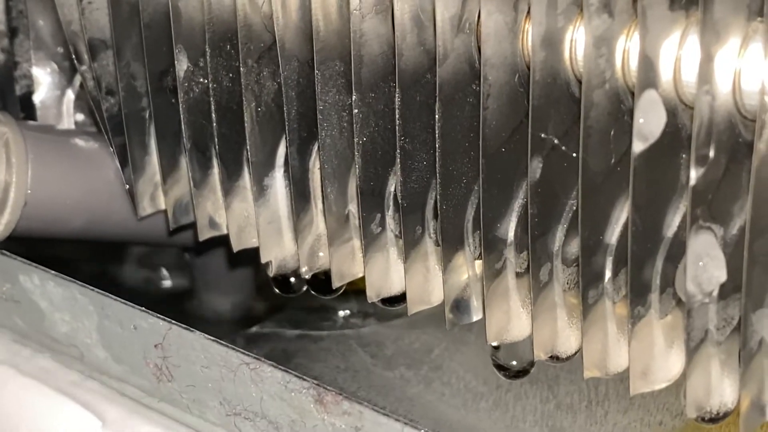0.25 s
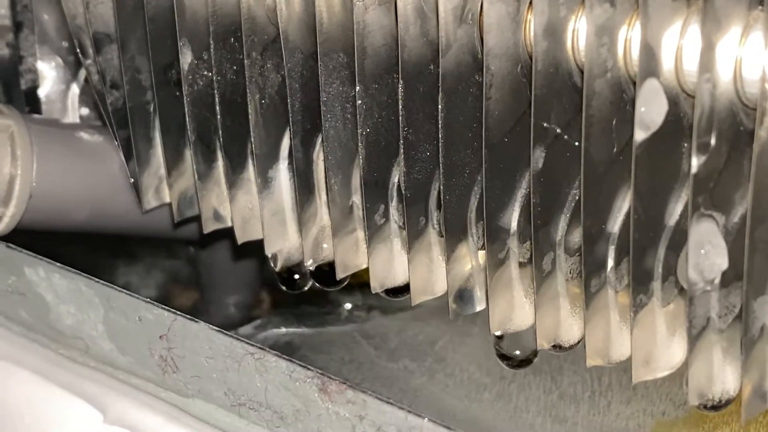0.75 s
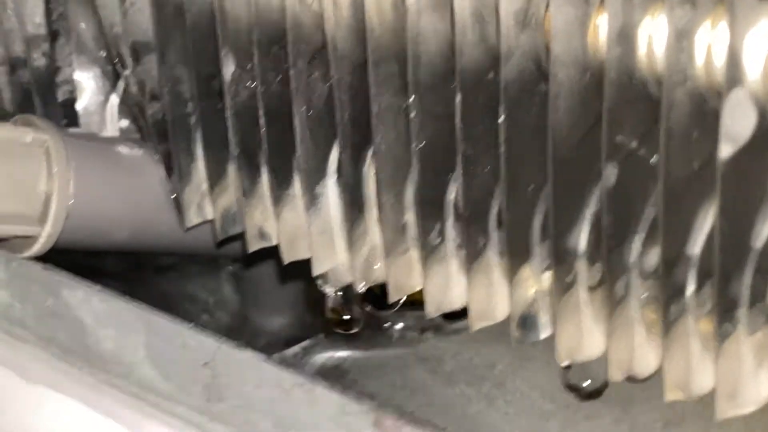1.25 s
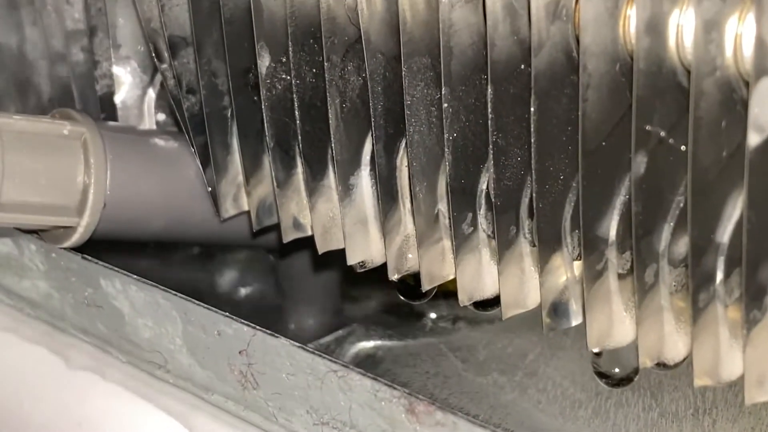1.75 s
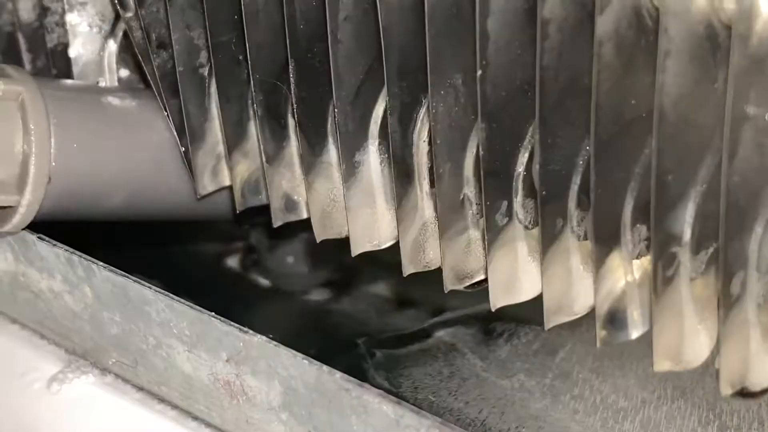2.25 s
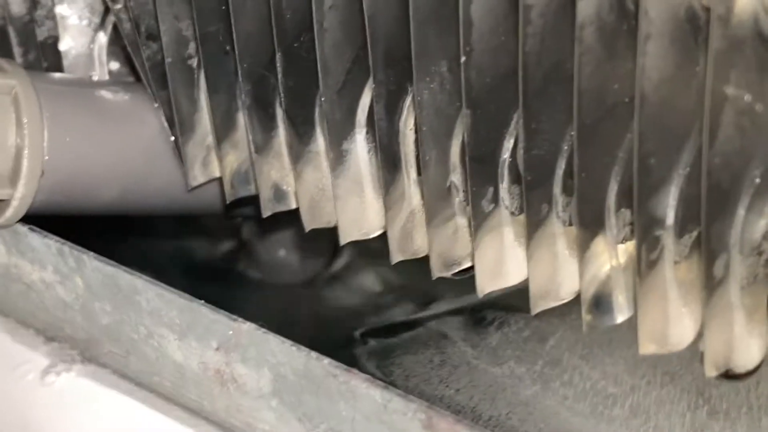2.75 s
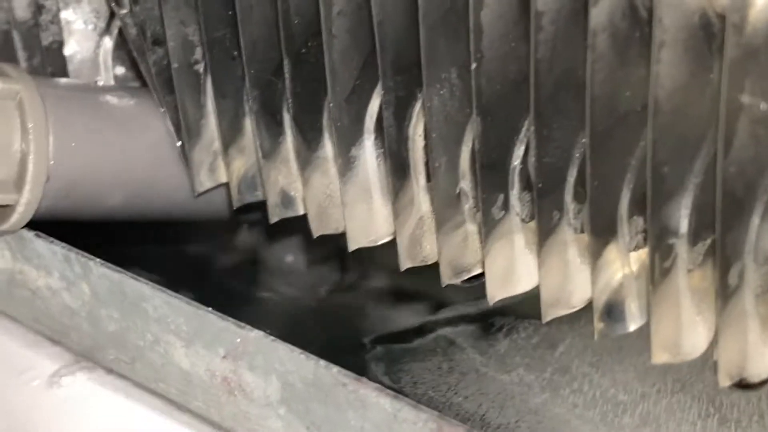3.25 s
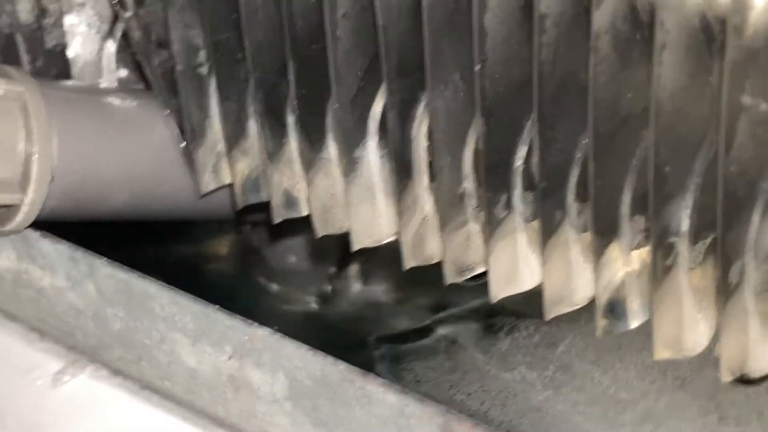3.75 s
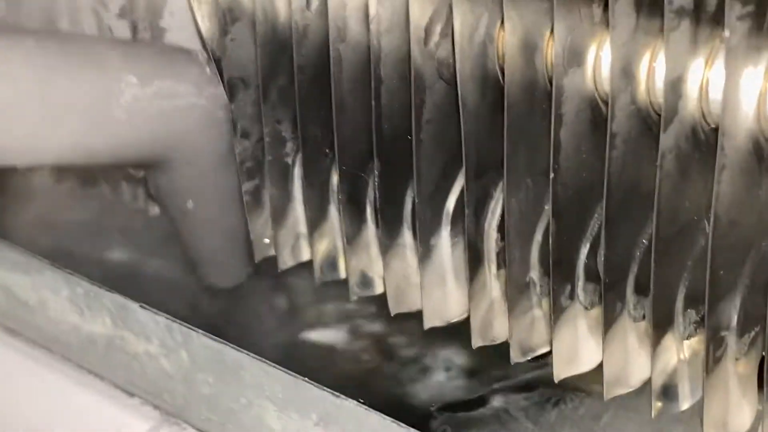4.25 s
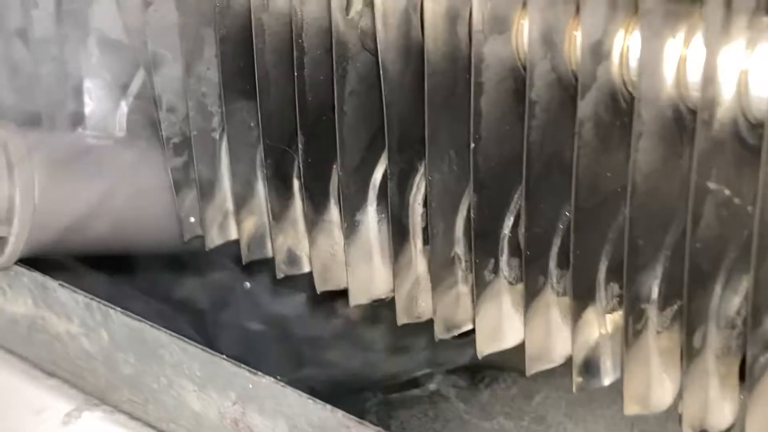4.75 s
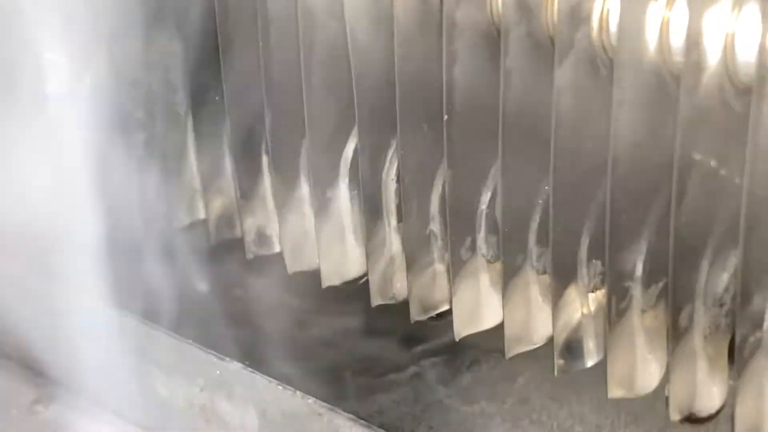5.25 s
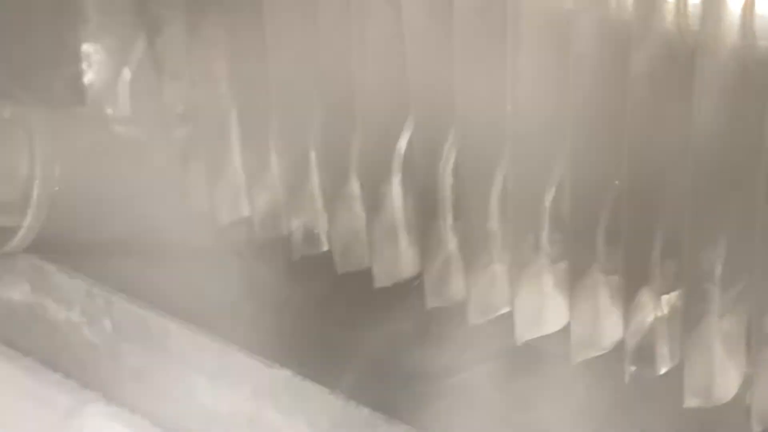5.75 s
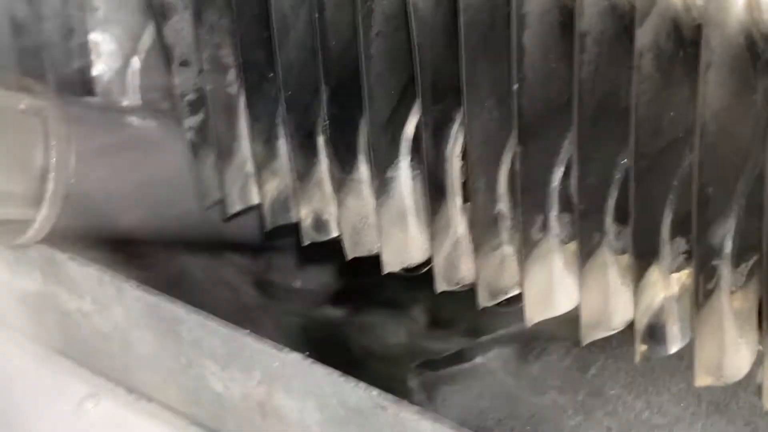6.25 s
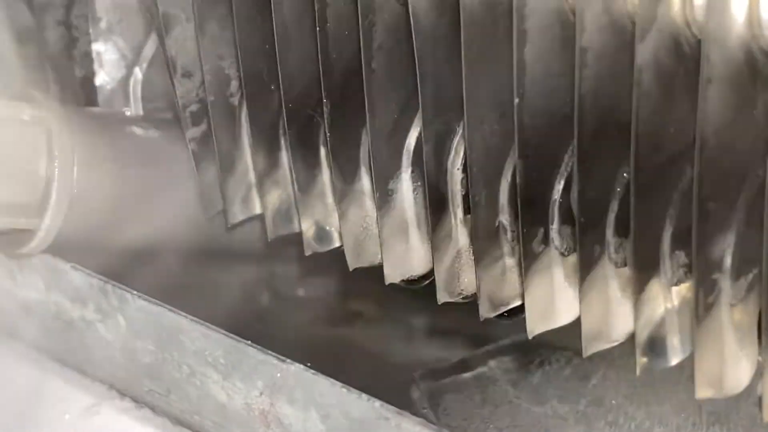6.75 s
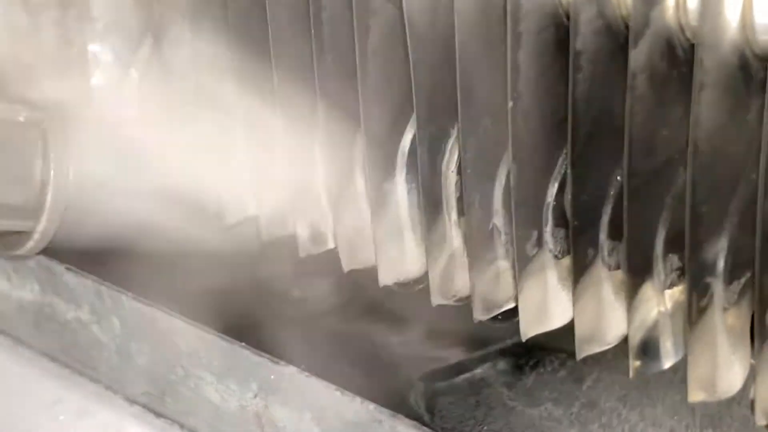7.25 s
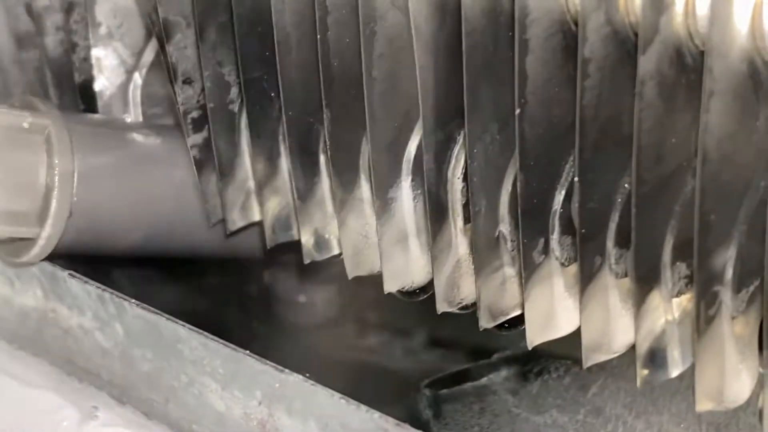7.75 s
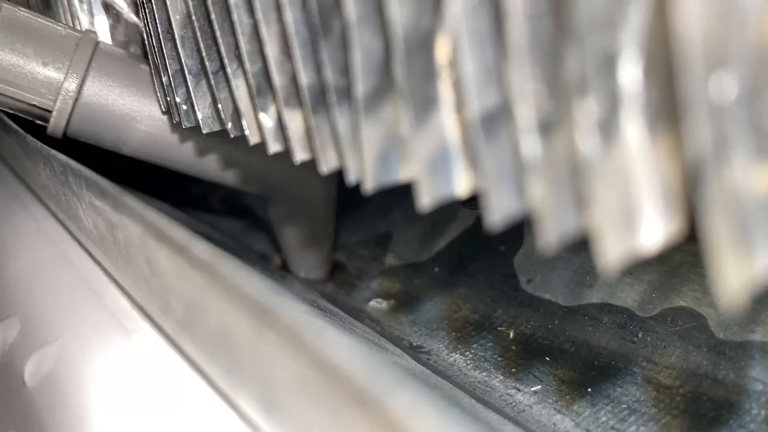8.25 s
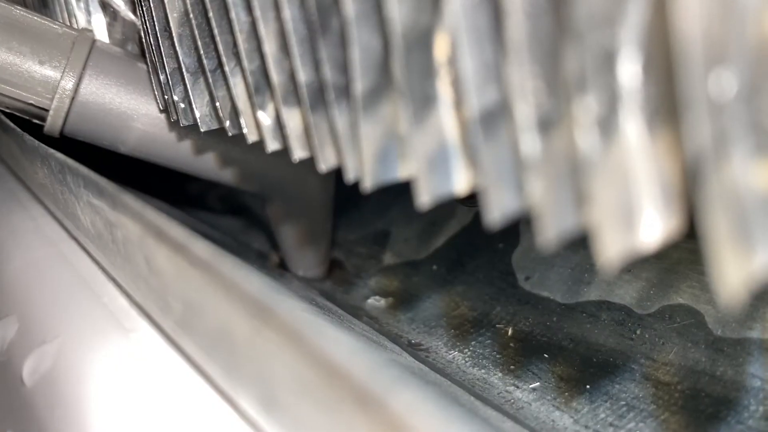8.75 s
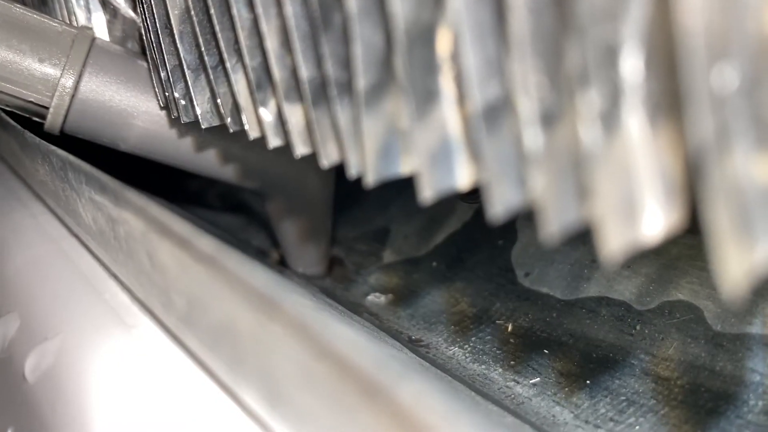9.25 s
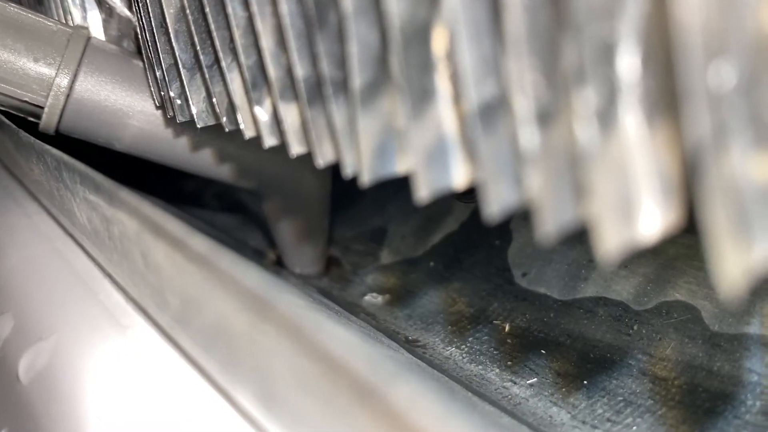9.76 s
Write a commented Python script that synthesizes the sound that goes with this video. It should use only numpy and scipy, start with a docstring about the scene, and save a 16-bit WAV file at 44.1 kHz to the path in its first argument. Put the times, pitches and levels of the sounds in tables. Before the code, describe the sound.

A vacuum nozzle slurps and gurgles in a metal pan of water, crackles and thumps while submerged, then rushes steadily.

```python
"""A hose nozzle works in the water of a metal drain pan inside a small cabinet, heard from three places.
First it slurps at the surface: spray squirts, the gap under it whistles, a hollow gulps, froth builds.
From 2.3 s, under water, gas pockets collapse with a crack and thump the pan. Near 4.1 s the nozzle
lifts clear and hisses for half a second, then the collapses return. From 8.1 s, heard from the side,
the free jet rushes steadily."""
import sys
import numpy as np
from scipy import signal
from scipy.fft import rfft, irfft, next_fast_len
from scipy.io import wavfile
from scipy.ndimage import uniform_filter1d, map_coordinates

SR = 44100
rng = np.random.default_rng(int(sys.argv[2]) if len(sys.argv) > 2 else 0)


def unload_audio(sound):
    """Save the sound as a 16-bit wav file, at the path given as the first command line argument."""
    columns = np.transpose(np.atleast_2d(sound))
    # keep every value between -1 and 1, then stretch to whole-number steps
    steps = np.round(np.clip(columns, -1, 1) * 32767)
    wavfile.write(sys.argv[1], SR, steps.astype(np.int16))


N = 441000
TIME = np.arange(N) / SR


def amp(db):
    return 10 ** (np.asarray(db) / 20)


def unit(x):
    return x / np.sqrt(np.mean(x ** 2, axis=-1, keepdims=True) + 1e-20)


def along(table, hz, column=1):
    """One column of a frequency table, read on a log axis."""
    columns = np.transpose(table)
    return np.interp(np.log(hz + 1), np.log(columns[0] + 1), columns[column])


def fader(table):
    """A gain through (time_s, level_db) points, silent outside them."""
    return amp(np.interp(TIME, *np.transpose(table), left=-200, right=-200))


def wobble(rate_hz):
    """A smooth random curve."""
    return map_coordinates(rng.standard_normal(int(N * rate_hz / SR) + 4), [TIME * rate_hz])


def filtered(x, response):
    """x through a complex frequency response."""
    n = x.shape[-1]
    size = next_fast_len(n + 8192)
    return irfft(rfft(x, size) * response(np.fft.rfftfreq(size, 1 / SR)), size)[..., :n]


def modes(table):
    """The response of a set of resonances."""
    return lambda f: sum((-1) ** k * amp(db) * 1j * f * width / (hz * hz - f * f + 1j * f * width)
                         for k, (hz, width, db) in enumerate(table))


def peaked(spectrum, peaks, lift):
    """A broad spectrum with resonant peaks standing on it."""
    return lambda f: amp(along(spectrum, f)) * np.sqrt(1 + sum(
        lift * amp(db) ** .5 / (1 + (2 * (f - hz) / width) ** 2) ** 2 for hz, width, db in peaks))


def noise(response, flutter_db, rate_hz):
    """Coloured noise of rms 1 whose level flutters."""
    return unit(filtered(amp(flutter_db * wobble(rate_hz)) * rng.standard_normal(N), response))


def placed(start_s, sounds):
    """Sums short sounds at their start times."""
    at = np.round(np.asarray(start_s) * SR).astype(int)[:, None] + np.arange(sounds.shape[1])
    return np.bincount(at.ravel(), sounds.ravel(), N + SR)[:N]


def gate(rows, edge_s=.008):
    """A gain that opens for each (start_s, length_s, level_db) row."""
    start, length, db = np.transpose(rows)[:, :, None]
    t = np.arange(SR // 3) / SR
    return placed(start[:, 0], amp(db) * np.clip(np.minimum(t, length - t) / edge_s + 0.74, 0, 1))


def bursts(count, t60, response, rise_s, lumps=0.41):
    """Rows of lumpy, decaying noise, peak 1."""
    t = np.arange(SR // 10) / SR
    grain = np.exp(lumps * unit(uniform_filter1d(rng.standard_normal((count, len(t))), size=40)))
    envelope = amp(-60 * t / t60) * (1 - np.exp(-t / rise_s))
    rows = filtered(grain * rng.standard_normal(grain.shape) * envelope, response)
    return rows / np.abs(rows).max(axis=1, keepdims=True)


def bubbles(count, centre_hz, spread, cycles):
    """Random small bubbles, rms 1: damped tones that rise in pitch."""
    when, pitch, size = rng.random(count), 2 * rng.random((count, 1)) - 1, rng.random((count, 1))
    age = np.arange(SR // 40) / SR * centre_hz * np.exp(spread * pitch) / cycles
    tone = np.sin(2 * np.pi * cycles * (age + 0.25 * age ** 2))
    return unit(placed(when * N / SR, amp(20 * size) * age * np.exp(-4 * age) * tone))


def rings(rows, cycles, climb):
    """Single bubbles: a soft start, a few cycles, the pitch climbing."""
    start, db, hz = np.transpose(rows)[:, :, None]
    age = np.arange(SR // 20) / SR * hz / cycles
    tone = np.sin(2 * np.pi * cycles * (age + climb * age ** 2))
    return placed(start[:, 0], amp(db) * 4 * age * np.exp(1 - 4 * age) * tone)


# Whistle glides: start_s, length_s, from_hz, to_hz, level_db
WHISTLES = [(.0, 0.029, 3500, 1900, -43), (0.092, 0.049, 4500, 1880, -44.5),
            (0.19, 0.056, 4010, 1840, -47.5), (0.397, 0.059, 4610, 1710, -45),
            (0.51, 0.064, 4430, 1910, -45), (0.734, 0.056, 4630, 2720, -53), (0.942, 0.04, 4540, 3500, -44),
            (2.095, 0.045, 4220, 2020, -47), (4.054, 0.063, 499, 1385, -36.5),
            (4.09, 0.0606, 1285, 1517, -29), (4.562, .042, 5570, 6750, -40)]

def whistles(mouth_hz=(4150, 3200, 2100), mouth_db=(4, 10, 5), rough_hz=200):
    """The gap under the nozzle changes size: a breathy tone glides, flaring at the mouth's pitches."""
    start, length, from_hz, to_hz, db = np.transpose(WHISTLES)[:, :, None]
    progress = np.clip(np.arange(SR // 8) / SR / length, 0, 1)
    hz = from_hz + (to_hz - from_hz) * progress
    hz -= sum(0.98 * (hz - mouth) * np.exp(-((hz - mouth) / 420) ** 2) for mouth in mouth_hz)  # lingers
    phase = 2 * np.pi * np.cumsum(hz, axis=1) / SR
    flare_db = sum(top / (1 + ((hz - mouth) / 260) ** 2) for mouth, top in zip(mouth_hz, mouth_db))
    fuzz = unit(filtered(rng.standard_normal((4, *hz.shape)), lambda f: 1 / (1 + (f / rough_hz) ** 2)))
    tone = fuzz[0] * np.sin(phase) + fuzz[1] * np.cos(phase)
    octave = fuzz[2] * np.sin(2 * phase) + fuzz[3] * np.cos(2 * phase)
    tone += amp(-9) * (to_hz < from_hz) * octave
    return placed(start[:, 0], amp(db + flare_db) * np.sin(np.pi * progress ** 0.44) ** 0.49 * tone)


# The hollow stands open and spray escapes: start_s, length_s, spray_db
GULPS = [(0.034, 0.049, -53), (0.146, 0.042, -45), (0.248, 0.066, -47), (0.453, 0.062, -46),
         (0.577, 0.087, -41.5), (0.704, 0.039, -42.5), (0.793, 0.075, -45), (0.902, 0.039, -57),
         (1.001, 0.098, -50.5), (1.137, 0.063, -73), (1.23, 0.187, -49), (1.453, 0.13, -64),
         (1.606, .18, -58), (1.821, 0.2, -54), (2.048, 0.051, -43.5), (2.169, .22, -48.5)]
# Bursts of spray alone: start_s, length_s, level_db
SQUIRTS = [(0, 0.021, -38.5), (.083, 0.05, -40), (.185, 0.043, -38), (.385, 0.053, -38.5),
           (.51, 0.048, -41.5), (.739, 0.024, -46), (.93, 0.029, -42.5), (2.09, 0.027, -41.5)]
# Spray colour: freq_hz, level_db
SPRAY_EQ = [(500, 5.5), (1500, -13), (2400, 5.5), (3200, -2.5), (3800, -7.5), (4600, 5), (5700, -7),
            (6500, 0.5), (7600, -3), (9700, -5.5), (12000, -5.5), (16000, -9)]

def spray(froth):
    """Spray hisses from the nozzle, chopped ever harder as the froth thickens."""
    sputter = unit(amp((1.26 + 0.58 * froth) * 3 * (wobble(110) + wobble(34.86))))
    hiss = noise(lambda f: amp(along(SPRAY_EQ, f)), flutter_db=3, rate_hz=120)
    squirt = noise(lambda f: amp(along(SPRAY_EQ, f)) / (1 + (3000 / (f + 1)) ** 6), 4, rate_hz=64)
    fizz = froth * amp(-4.5) * bubbles(6000, centre_hz=2230, spread=0.29, cycles=9.5)
    return (amp(-55) + gate(GULPS)) * sputter * (hiss + fizz) + gate(SQUIRTS, edge_s=0.025) * squirt


# Hum fader: time_s, level_db
HUM_LEVEL = [(0, -53), (.07, -50), (.2, -53), (.45, -49), (.9, -50.5), (1.6, -48), (2.0, -48.5),
             (2.13, -49), (2.283, -44.5)]
# The pan's hum notes: pitch_hz, width_hz, level_db
HUM_MODES = [(172.5, 45, 1.5), (428, 54, -7)]

def pan_hum(lag_s=0.027, shut_gain=0.49):
    """The pan hums, swelling just after each gulp."""
    swell = shut_gain + gate([(start + lag_s, length, 0) for start, length, _ in GULPS], edge_s=0.025)
    return fader(HUM_LEVEL) * swell * noise(lambda f: modes(HUM_MODES)(f) ** 2, flutter_db=2, rate_hz=28)


# Resonances of the hollow: pitch_hz, width_hz, level_db
HOLLOW_MODES = [(1053, 105, -5.5), (1410, 77, -23), (835, 450, -11)]

def hollow(froth, open_db=-46.5):
    """Gas and water alternate in the nozzle: a hollow opens and shuts, bubbles, and hoots once."""
    opening = amp(-57) + gate([(start, length, open_db) for start, length, _ in GULPS])
    breath = noise(lambda f: modes(HOLLOW_MODES)(f) / (1 + (640 / (f + 1)) ** 6), 0, rate_hz=120)
    hoot = noise(lambda f: modes([(1046, 230, 0)])(f) ** 2, flutter_db=1, rate_hz=32)
    gurgle = froth * amp(-0.5) * bubbles(3000, centre_hz=1125, spread=0.36, cycles=7.5)
    blips = scattered(-43.5, bursts(170, t60=0.016, response=modes(HOLLOW_MODES), rise_s=0.0018))
    return opening * (breath + gurgle + blips / amp(open_db)) + gate([(0.352, 0.034, -33.5)]) * hoot


# The loudest spits: start_s, peak_db
SPITS = [(0.301, -30), (0.379, -34), (1.0415, -28), (1.242, -39), (1.321, -21), (1.396, -33), (1.455, -23),
         (1.513, -19), (1.545, -22), (1.558, -22), (1.572, -25), (1.6213, -23.5), (1.691, -22),
         (1.8102, -22.5), (1.8642, -22), (1.899, -19.5), (1.931, -23), (2.041, -24.5)]
# The loudest froth bubbles: start_s, peak_db, pitch_hz
BLOPS = [(0.934, -25.5, 1030), (1.0, -33, 1050), (1.163, -28, 1390), (1.235, -35, 980), (1.292, -38, 935),
         (1.34, -23.5, 1130), (1.395, -28, 1420), (1.448, -34, 1180), (1.48, -26.5, 1390),
         (1.593, -27, 1370), (1.701, -32, 923), (1.754, -27, 1220), (1.835, -28, 1440), (1.86, -32.5, 869),
         (1.92, -31, 904), (1.988, -28.5, 950), (2.077, -34, 1400), (2.18, -30, 1400), (2.271, -33, 1340)]

def frothing():
    """Froth spits and blops over a fine spatter."""
    start, db = np.transpose(SPITS)
    spits = bursts(len(start), 0.025, spit_colour(len(start), floor=1), rise_s=0.003, lumps=0.56)
    spatter = scattered(-36, bursts(140, 0.01, spit_colour(140, floor=0.28), rise_s=0.001))
    return placed(start, amp(db)[:, None] * spits) + spatter + rings(BLOPS, cycles=5.7, climb=0.034)


def spit_colour(count, floor):
    """Each spit favours the pitch of its own bubble."""
    hz = 1300 * 5.5 ** rng.random((count, 1))
    return lambda f: amp(along(SPRAY_EQ, f)) * (floor + 1 / (1 + ((f - hz) / (0.19 * hz)) ** 4))


def scattered(db, sounds, span_s=(1.0, 2.28), scatter_db=4):
    """Short sounds at random moments and levels."""
    size = amp(db + scatter_db * rng.standard_normal((len(sounds), 1)))
    return placed(rng.uniform(*span_s, len(sounds)), size * sounds)


# How hard the water boils round the nozzle: time_s, level_db
BOIL_LEVEL = [(2.283, -68), (2.38, -71), (2.39, -48), (2.6, -44.5), (3.3, -45), (4.1, -44), (4.2, -72),
              (4.59, -65.5), (4.61, -52), (4.9, -60.5), (5.1, -49.5), (5.7, -49), (6.2, -49.5),
              (7.2, -49.5), (8.13, -46.5)]
# Pan floor, trough and fins ringing: pitch_hz, width_hz, level_db
PAN_MODES = [(125.2, 48.6, -1.5), (177, 66, -5.5)]
TROUGH_MODES = [(367, 35.4, -0.5), (547, 33, 2.5), (655, 39, 1), (757, 51, -7), (874, 44, -2.5),
                (1051, 46, -8)]
FIN_MODES = [(1503, 33, 33), (1825, 84, 9), (1990, 60, 20), (2227, 116, 22), (3070, 430, 4),
             (3606, 240, 23)]
# Fizz colour: freq_hz, level_db
FIZZ_EQ = [(150, -50), (300, 7.5), (1000, -3), (2000, -11.5), (4000, -15), (6000, -18.5), (10000, -24),
           (16000, -23)]

def simmer():
    """Under water, small bubbles keep pan, trough and fins busy."""
    throb = noise(lambda f: modes(PAN_MODES)(f) / (1 + (f / 260) ** 4), flutter_db=1.5, rate_hz=50)
    churn = 1.14 * noise(modes(TROUGH_MODES), flutter_db=8.5, rate_hz=88)
    gurgle = bubbles(500, centre_hz=626, spread=0.454, cycles=6)
    churn += 0.38 * unit(filtered(gurgle, modes(TROUGH_MODES)))
    fizz = noise(peaked(FIZZ_EQ, FIN_MODES, lift=0.94), flutter_db=2.5, rate_hz=70)
    splutter = bubbles(6000, centre_hz=2500, spread=.5, cycles=6.7)
    fizz += 0.21 * unit(filtered(splutter, peaked([(1000, 0)], FIN_MODES, lift=.8)))
    return fader(BOIL_LEVEL) * (amp(5) * throb + churn + fizz)


# Small collapses whose crack stands out: start_s, crack_db
SMALL_POPS = [(2.5346, -18), (3.0121, -32), (3.1657, -29), (3.4151, -33.5), (3.5535, -30), (3.625, -34),
              (3.7183, -36), (3.822, -34), (5.3537, -37), (5.4293, -32), (5.8286, -33.5), (6.0487, -37),
              (6.1789, -34), (6.2654, -23), (6.3205, -32), (7.1672, -37), (7.3922, -33), (7.4927, -32),
              (7.6016, -37), (7.656, -36), (7.842, -33)]

def weak_pops(every_s=.034, jitter_s=.003):
    """Rows like POPS: the small collapses, and weak ones that fill the gaps and follow the boil."""
    over_boil_db, scatter_db = (4.5, -26.5, 4.5, 9.5), (5.9, 7.8, 7.8, 2.2)
    small_s, small_db = np.transpose(SMALL_POPS)
    edges = [BOIL_LEVEL[0][0], *np.sort([*np.transpose(POPS)[0], *small_s]), BOIL_LEVEL[-1][0]]
    fill_s = np.concatenate([np.linspace(a, b, max(round((b - a) / every_s), 1) + 1)[1:-1]
                             for a, b in zip(edges, edges[1:])])
    start = np.append(small_s, fill_s + jitter_s * rng.standard_normal(len(fill_s)))
    levels = np.interp(start, *np.transpose(BOIL_LEVEL))[:, None] + over_boil_db
    levels += scatter_db * rng.standard_normal(levels.shape)
    levels[:len(small_s), 0] = small_db
    return np.column_stack([start, levels])


# The clear collapses: start_s, crack_db, snap_db, knock_db, thump_db
POPS = [(2.4534, -26.5, -57, -31, -25.5), (2.5154, -10, -31, -18.5, -27), (2.5631, -12, -30.5, -20, -30),
        (2.637, -12.5, -34, -32, -26.5), (2.6804, -13, -53, -34, -26.5), (2.7123, -21.5, -36, -29, -29),
        (2.7689, -18, -37, -20.5, -25), (2.8377, -19.5, -30.5, -24, -25), (2.872, -29, -52, -42, -27),
        (2.9358, -18, -43, -33, -33), (3.046, -28, -51, -43, -52), (3.0722, -29, -45, -32.5, -25.5),
        (3.1992, -12, -34, -25, -23.5), (3.2765, -18, -39, -25, -31), (3.3076, -19, -35.5, -25, -32),
        (3.3537, -30, -35.5, -30.5, -27), (3.4527, -30, -58, -32, -38), (3.4868, -31.5, -54, -38, -26),
        (3.5226, -29, -53, -31.5, -49), (3.684, -32, -49, -53, -27.5), (3.7814, -26.5, -57, -36, -27),
        (3.868, -12, -30.5, -21, -28), (3.8868, -15.5, -32.5, -20.5, -33),
        (3.9145, -12.5, -32.5, -20.5, -29), (3.9887, -25.5, -50, -29, -45), (4.0516, -39, -48, -33, -33),
        (4.1012, -22, -53, -50, -43), (4.136, -23, -47, -45, -41), (4.7525, -29, -45, -58, -53),
        (4.791, -25.5, -45, -30, -42), (4.8273, -21, -43.5, -31, -38), (4.969, -33, -61, -31.5, -36),
        (5.051, -20.5, -44, -27, -31.5), (5.0866, -19, -39.5, -25, -32), (5.1271, -28, -61, -30.5, -30),
        (5.1705, -31, -43.5, -36, -34), (5.256, -38, -64, -32.5, -32), (5.3176, -27, -59, -42, -31.5),
        (5.3929, -21.5, -40.5, -26, -33), (5.4637, -31, -47, -28, -38), (5.5622, -23, -57, -21, -31.5),
        (5.5843, -16.5, -32.5, -23.5, -34), (5.613, -20, -38, -30, -29.5), (5.6404, -20, -53, -26.5, -35),
        (5.672, -22.5, -60, -26, -29.5), (5.7083, -21, -39.5, -28, -33), (5.739, -29, -63, -36, -35),
        (5.7953, -34, -64, -33.5, -32), (5.87, -17, -36, -22, -33), (5.897, -17, -35, -20.5, -34),
        (5.912, -15.5, -36, -30, -35), (5.9667, -28, -49, -29.5, -28.5), (6.142, -36, -58, -33, -38),
        (6.2506, -23, -39.5, -27.5, -42), (6.2858, -16, -35, -34, -32), (6.4459, -27, -48, -31, -40),
        (6.5098, -30, -49, -31, -33.5), (6.5421, -25, -56, -32, -36), (6.6133, -21, -44, -32, -34),
        (6.6713, -25, -59, -28.5, -37), (6.8308, -27, -48, -29, -32.5), (6.8586, -20, -47, -34, -32),
        (6.9554, -24.5, -60, -27.5, -33), (6.988, -27, -49, -27, -36), (7.0345, -21.5, -44.5, -27, -29),
        (7.074, -17, -41, -26, -32), (6.7393, -37.5, -60, -32, -44), (7.1946, -22.5, -43.5, -32, -33.5),
        (7.275, -17, -41, -27.5, -33), (7.3002, -31, -65, -33, -36), (7.3619, -32, -50, -48, -34),
        (7.4575, -37, -56, -31.5, -32.5), (7.6212, -29, -64, -31, -34), (7.721, -25.5, -44, -23, -48),
        (7.731, -26, -32, -28.5, -38), (7.7397, -17.5, -27.5, -21, -44), (7.7744, -23.5, -40, -25, -31),
        (7.809, -15.5, -37, -25.5, -30.5), (7.877, -33, -51, -32, -33), (8.0249, -18, -40, -33, -27)]
# Crack colour: freq_hz, level_db
CRACK_EQ = [(600, 6.5), (1200, 7.5), (2500, 0.5), (3800, -4.5), (5500, -6), (8000, -14), (12000, -20.5),
            (16000, -24.5)]

def pops(snap_crest_db=11, knock_crest_db=2.5, thump_crest_db=6.5):
    """Each collapse cracks in the fins and knocks the trough; its pressure wave swings the pan floor."""
    start, crack_db, snap_db, knock_db, thump_db = np.vstack([POPS, weak_pops()]).T[:, :, None]
    count = len(start)
    pocket_hz = 3000 * np.exp(0.18 * rng.standard_normal(start.shape))  # each has its own size
    softness = amp(-.7 * (crack_db + 17))  # weak collapses swell more slowly
    fins = peaked(CRACK_EQ, FIN_MODES, lift=2.5)
    crack = bursts(count, 0.032, lambda f: fins(f) * (1 + 2 / (1 + ((f - pocket_hz) / 700) ** 2)),
                   rise_s=0.00025 * softness)
    snap = bursts(count, 0.029, lambda f: amp(along(CRACK_EQ, f)) * f ** 4 / (f ** 4 + 5800.0 ** 4),
                  rise_s=0.00018 * softness, lumps=0.91)
    knock = bursts(count, 0.046, modes(TROUGH_MODES), rise_s=0.00099)
    seethe = bursts(count, 0.083, lambda f: fins(f) / (1 + (f / 4500) ** 4), rise_s=0.0018)
    t = np.arange(crack.shape[1]) / SR
    detune = 1 + 0.045 * rng.standard_normal(start.shape)
    swing = sum(amp(db - 32 * width * t) * np.cos(2 * np.pi * hz * detune * (t - .009))
                for hz, width, db in PAN_MODES)  # a wide mode dies fast
    thump = (1 - np.exp(-t / 0.024)) ** 3 * swing
    thump /= np.abs(thump).max(axis=1, keepdims=True)
    top = amp(crack_db) * (crack + amp(-13.5) * seethe) + amp(snap_db + snap_crest_db) * snap
    body = amp(knock_db + knock_crest_db) * knock + amp(thump_db + thump_crest_db) * thump
    return placed(start[:, 0], top + body)


# Underwater gulps: start_s, level_db, pitch_hz
PLOPS = [(2.77, -23, 620), (2.839, -25, 371), (2.938, -23, 390), (3.046, -25, 660), (3.2, -30, 880),
         (3.31, -18.5, 640), (3.782, -26, 637), (3.87, -16, 716), (3.916, -19, 684), (3.991, -31, 650),
         (4.053, -31, 650), (5.088, -27, 630), (5.319, -27.5, 630), (5.395, -30, 536), (5.566, -31, 547),
         (5.641, -27.5, 566), (5.673, -36, 650), (5.71, -30, 568), (5.9, -25, 590), (5.967, -22.5, 870),
         (6.451, -26.5, 570), (6.513, -22, 656), (6.833, -29, 640), (7.037, -27, 674), (7.076, -27, 550),
         (7.277, -28, 557), (7.725, -25, 650), (7.811, -30, 566), (7.88, -27.5, 569.5)]

def plops():
    """A gulp makes one pitch of the trough ring out."""
    return amp(5.5) * filtered(rings(PLOPS, cycles=3.4, climb=0.012), modes(TROUGH_MODES))


# Hiss fader: time_s, level_db
LIFT_LEVEL = [(4.08, -44), (4.105, -49), (4.13, -36), (4.14, -19), (4.15, -25), (4.19, -27), (4.25, -29.5),
              (4.58, -32), (4.6, -35.5)]
# Hiss colour: freq_hz, level_db
LIFT_EQ = [(150, -39), (500, -22.5), (2700, -16), (3000, -4), (4700, -5), (6000, -16), (7500, -10),
           (10000, -14), (11800, -10), (13000, -1.5), (14500, -7.5), (16000, -13)]
# Hiss resonances: pitch_hz, width_hz, weight_db
LIFT_MODES = [(1450, 1130, 11), (3250, 600, 2), (3380, 140, -4), (4660, 370, -9), (5200, 61, 9),
              (7500, 230, -3), (11530, 600, -7)]

def lifted_hiss(slide=.025, patch_db=2.5, patch_hz=900, patch_s=.04):
    """Out of the water the gas hisses brightly; its resonances slide and swish as the nozzle moves."""
    hz, t, spectra = signal.stft(amp(0.52 * wobble(170)) * rng.standard_normal(N), SR, nperseg=512)
    shift = 1 + slide * wobble(9)[::256][np.minimum(np.arange(len(t)), (N - 1) // 256)]
    swish = uniform_filter1d(rng.standard_normal(spectra.shape), round(patch_hz / hz[1]), axis=0)
    swish = uniform_filter1d(swish, round(patch_s / t[1]), axis=1)
    spectra *= peaked(LIFT_EQ, LIFT_MODES, lift=4.4)(hz[:, None] * shift)
    spectra *= amp(patch_db * swish / swish.std())
    return fader(LIFT_LEVEL) * unit(signal.istft(spectra, SR, nperseg=512)[1][:N])


# Jet colour: freq_hz, level_db
JET_EQ = [(40, -24), (84, -5), (165, -20), (350, -18.5), (600, -7), (1200, -5), (2500, -11.5),
          (5500, -13.5), (7500, -9), (9300, -2.5), (10200, -18.5), (12500, -16.5), (14200, -10.5),
          (14800, -9.5), (16000, -10)]
# Cabinet resonances: pitch_hz, width_hz, weight_db
CABINET_MODES = [(625, 34, 4.5), (933, 35, -10), (1234, 40, 6), (1489, 74, 11), (1650, 32, -8),
                 (2077, 160, -4), (2530, 260, -4), (3010, 100, 1), (6450, 46, 12), (6700, 34, -4),
                 (7680, 41, -6), (7810, 53, 6), (9290, 120, -1), (10990, 160, 14), (14200, 90, -4),
                 (15000, 180, -4), (15700, 110, 6)]
# Notches where reflections cancel: freq_hz, half_width_hz, depth_ratio
NOTCHES = [(660, 19, 0.55), (870, 30, 0.7), (1093, 26, 0.7), (1263, 25, 0.5), (1447, 27, 0.68),
           (1547, 40, 0.4), (1857, 58, 0.82), (2390, 48, 0.85), (2960, 31, .55), (3630, 61, 0.86),
           (5570, 75, 1), (7070, 110, 0.75), (8850, 103, 0.86), (14750, 110, .6)]

def jet():
    """The free jet: smooth noise that excites the cabinet's modes."""
    colour = peaked(JET_EQ, CABINET_MODES, lift=5)
    notches = lambda f: np.prod([1 - depth / (1 + ((f - hz) / width) ** 2)
                                 for hz, width, depth in NOTCHES], axis=0)
    return amp(4) * noise(lambda f: colour(f) * notches(f), flutter_db=0.62, rate_hz=45)


def stereo(x, image, t60, drift):
    """Direct sound arrives with a phase gap; reflections differ between left and right and widen it."""
    t = np.arange(SR // 2) / SR
    tails = rng.standard_normal((2, len(t))) * amp(-60 * t / t60) * (t > .002)
    tails /= np.linalg.norm(tails[0])
    blend = drift * wobble(12)  # reflections drift between two patterns
    echo = signal.fftconvolve(x * [np.cos(blend), np.sin(blend)], tails, axes=1).sum(0)[:N]
    side = np.array([[.5], [-.5]])
    wet = lambda f: np.clip(1 - along(image, f, column=2), 0, 1) / (1 + (250 / (f + 1)) ** 8) / 2
    direct = filtered(x, lambda f: np.sqrt(1 - wet(f)) * np.exp(-1j * side * along(image, f)))
    reflected = filtered(echo, lambda f: 2 * side * np.sqrt(wet(f)))
    return filtered(direct + reflected, lambda f: amp(side * along(image, f, column=3)))


# The corner round the nozzle: pitch_hz, width_hz, weight_db
NOOK_MODES = [(723, 22, 12), (912, 44, 6), (1436, 82, 7), (2030, 64, 13), (3160, 70, 2), (4050, 150, -6),
              (5430, 130, 10), (6400, 200, -1), (7900, 140, 1)]
# Stereo image at each place: freq_hz, phase_gap_rad, direct_ratio, left_over_right_db
SLURP_IMAGE = [(400, 0.78, 0.45, 0), (900, 0.54, 0.71, -2.5), (2800, -0.045, 0.11, 2), (3680, -0.34, 1, 2),
               (5500, 0.63, 1, -0.5), (12000, .55, 0.98, 0.5), (14000, 0, .97, 0), (16000, -.2, .95, 4)]
BOIL_IMAGE = [(60, 0, 1, -2.1), (190, 0.08, 0.91, 3), (350, 1.08, 0.2, -5), (670, 0.13, 0.98, 0),
              (1230, 1.42, 1, -6.5), (1920, 0.5, 0.24, 4), (2930, 0.23, 1, 0.5), (4500, .5, 0.93, 0.5),
              (8600, 0.77, 1, -0.5), (11730, -0.9, 0.98, 1.5), (12130, 4, 1, -1), (13600, 3.5, 0.86, 0),
              (16000, 5.5, .6, 1)]
JET_IMAGE = [(100, 0, 1, 1), (850, 1.59, 1, -3), (2700, 0.86, 0.58, -3), (5000, 0, 0.43, -5.5),
             (7770, 1, 0.31, -2.5), (8900, 4, 1, 10), (9345, 2.5, 0.77, -4), (10500, -9, 1, 16),
             (11580, 0.7, 1, 1), (13150, -3.5, 1, -7), (13900, -4.5, 1, -1), (14900, -3.5, 0.64, 0),
             (15400, -7.5, .8, 4)]
# Jet fader: time_s, level_db
JET_LEVEL = [(8.13, -34.5), (8.156, -33), (10.0, -33.5)]

def scene():
    """Slurp, boil and jet, each from its own place, joined by hard cuts."""
    boil_s, jet_s = BOIL_LEVEL[0][0], JET_LEVEL[0][0]
    froth = np.clip(TIME, 0, 1) ** 2  # thickens over the first second
    glides = whistles()
    slurp = glides + spray(froth) + pan_hum() + hollow(froth) + frothing()
    slurp = filtered(slurp, peaked([(45, -17), (120, -1)], NOOK_MODES, lift=1.9))
    boil = glides + simmer() + pops() + plops() + lifted_hiss()
    mix = stereo(slurp, SLURP_IMAGE, t60=0.035, drift=0.87) * (TIME < boil_s)
    mix += stereo(boil, BOIL_IMAGE, t60=0.039, drift=1.5) * (TIME > boil_s) * (TIME < jet_s)
    return mix + stereo(jet(), JET_IMAGE, t60=0.96, drift=.3) * fader(JET_LEVEL)


def record(dry, bass_hz=50, top_hz=15780):
    """The microphone drops the deep bass; nothing is kept above the band limit."""
    return filtered(dry, lambda hz: (hz < top_hz) / (1 + (bass_hz / (hz + 1)) ** 3))


dry = scene()
out = record(dry)
unload_audio(out)
```